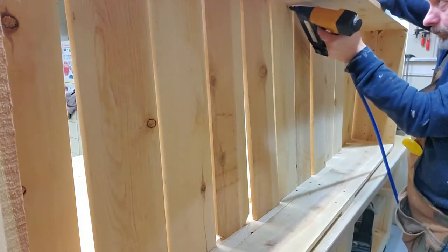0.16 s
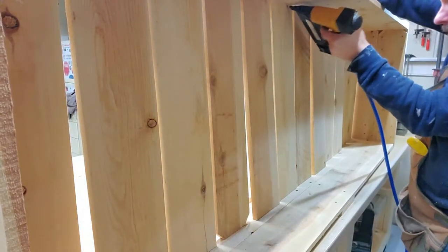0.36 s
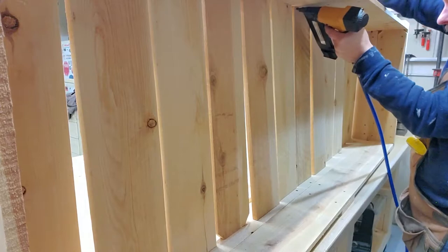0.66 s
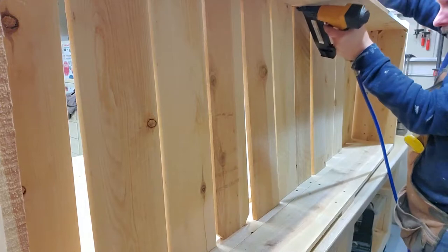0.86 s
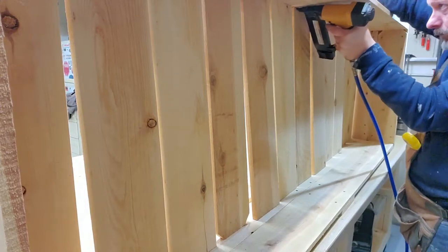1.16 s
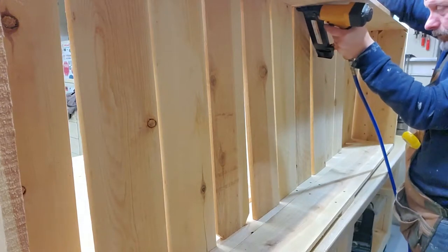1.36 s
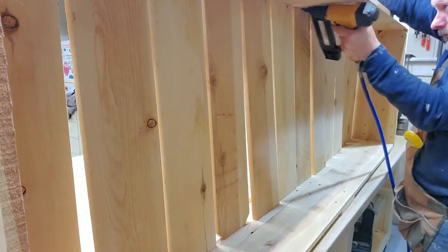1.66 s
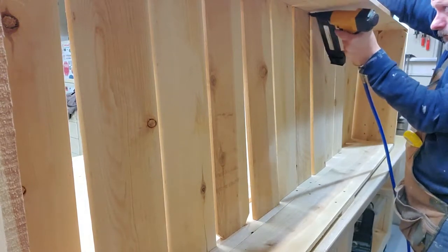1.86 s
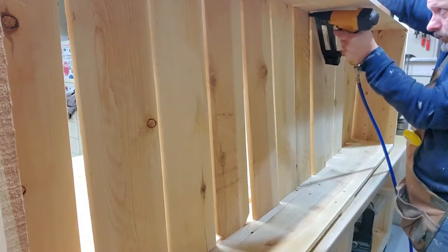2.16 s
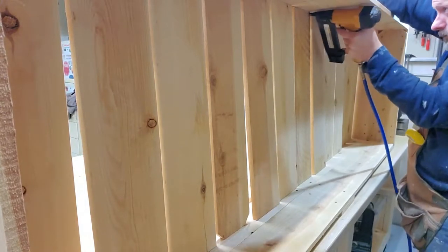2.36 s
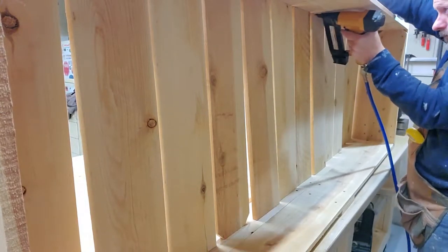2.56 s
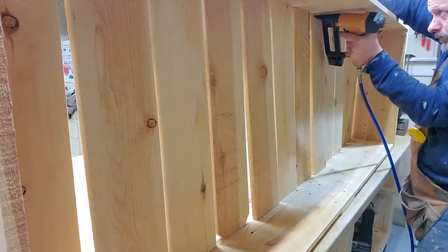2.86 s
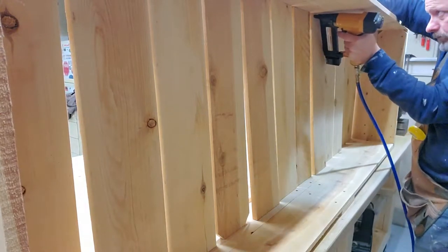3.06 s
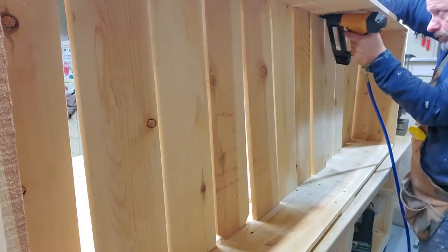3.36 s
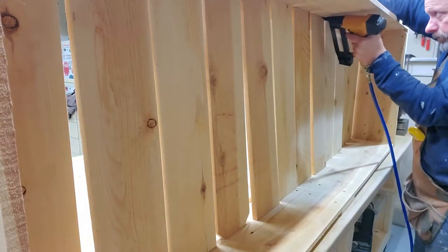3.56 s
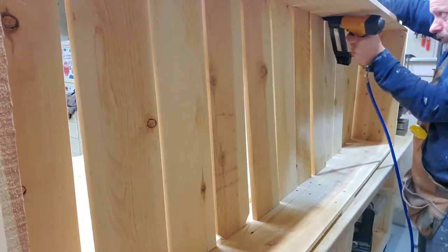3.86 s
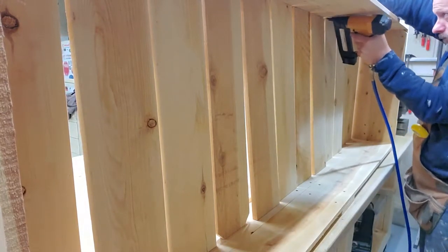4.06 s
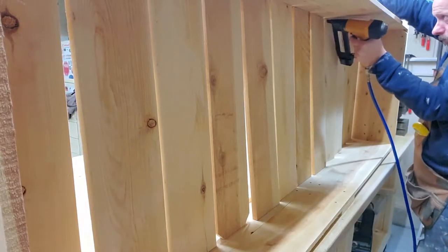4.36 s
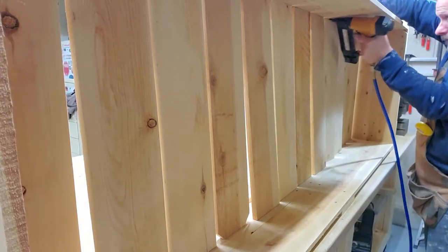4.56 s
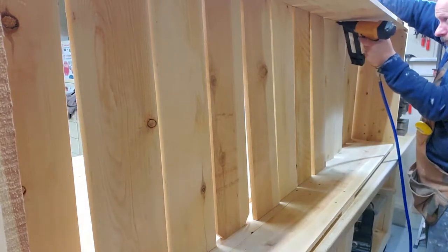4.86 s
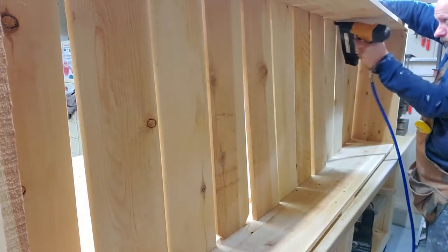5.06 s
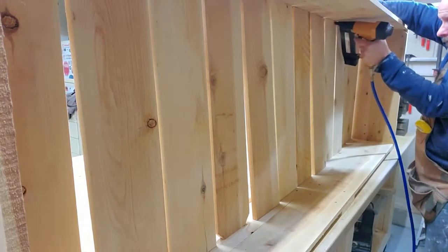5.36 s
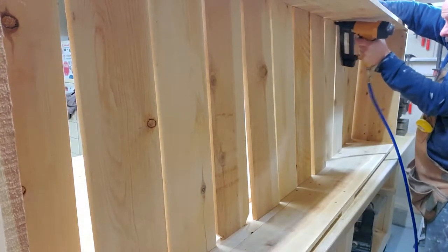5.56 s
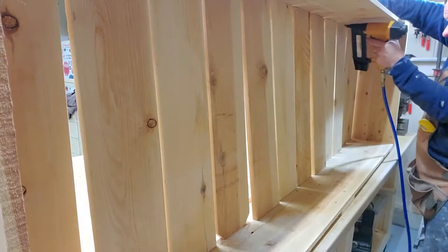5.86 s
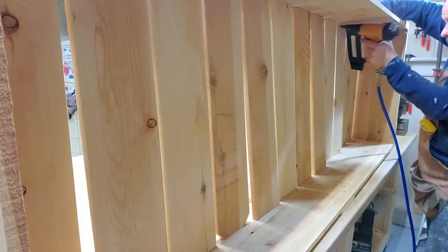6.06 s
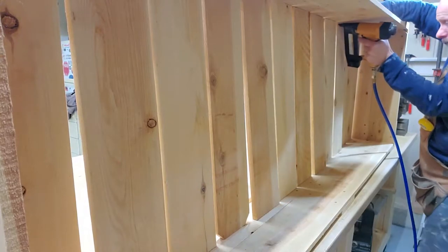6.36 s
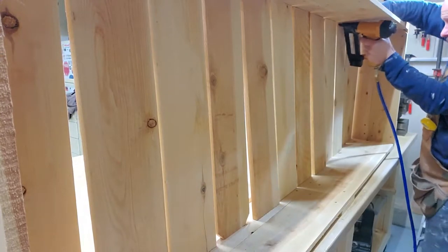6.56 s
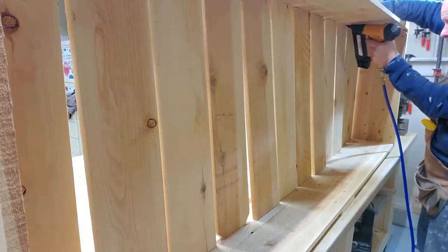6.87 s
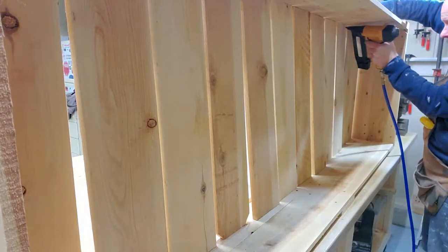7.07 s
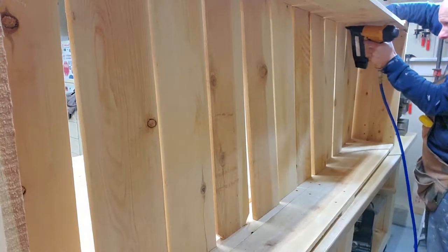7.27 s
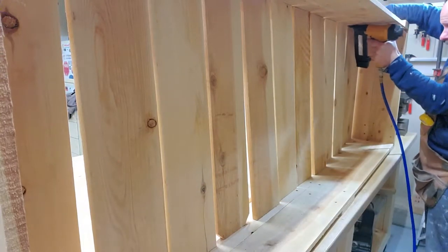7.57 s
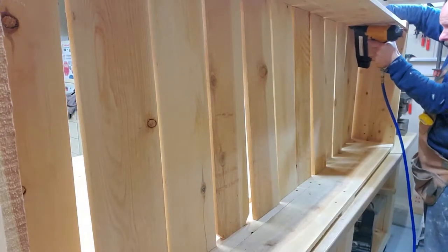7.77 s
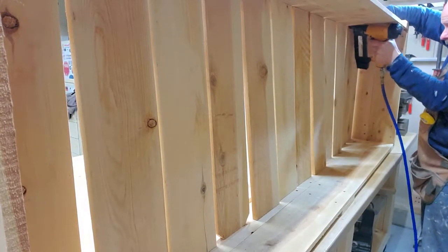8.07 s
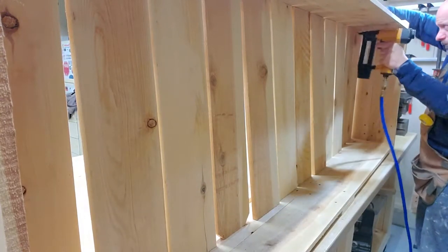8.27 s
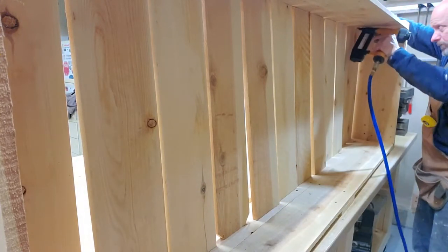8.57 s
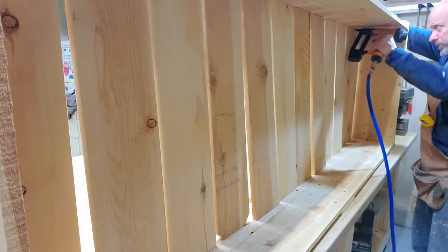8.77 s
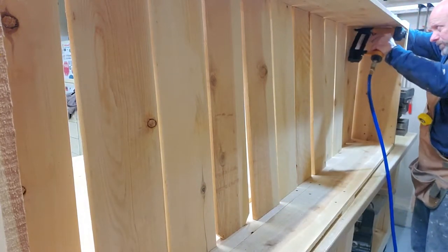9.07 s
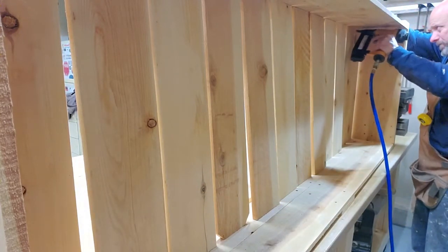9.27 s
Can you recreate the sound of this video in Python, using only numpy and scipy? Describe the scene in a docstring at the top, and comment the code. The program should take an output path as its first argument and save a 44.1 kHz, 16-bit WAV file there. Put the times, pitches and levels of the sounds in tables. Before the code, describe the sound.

An air nailer fires eleven hard nails about a second apart, each crack answered by a burst of air, tool taps and clicks between.

```python
"""Eleven hard, cracking shots of a pneumatic nailer ring out over pine boards in a workshop, each with a hissing blast.
Each shot: the valve spits, the piston slides, the driver slams the nail home, the exhaust blasts, the piston knocks back.
Between shots the nose knocks, clicks and rubs on the wood; still air and a faint hose leak lie underneath.
Shaped noise makes the air, roughened pulses the impacts and decaying sines the boards; spray echoes and a tail follow."""
import sys
import numpy as np
from scipy import signal
from scipy.fft import rfft, irfft, next_fast_len
from scipy.io import wavfile

SR = 44100
rng = np.random.default_rng(int(sys.argv[2]) if len(sys.argv) > 2 else 0)


def persist_wave(psi):
    """Save psi, clipped to +-1, as 16-bit WAV."""
    counts = np.round(np.clip(psi, -1, 1) * 32767).astype(np.int16)
    wavfile.write(sys.argv[1], SR, np.atleast_2d(counts).T)


N = 415419
AGE = np.arange(SR // 2) / SR  # seconds since the start of an event
SIZE = len(AGE)

# Nails driven. Each row: blow in seconds, trigger let go in seconds, board pitch in Hz, blow drive in dB,
# low thud drive in dB, exhaust treble from the aim of the cap in dB at 8 kHz.
SHOTS = [(0.0441, 0.1642, 1570, -16.5, -23.5, 1.5), (1.1081, 1.2342, 1594, -12.5, -23, -1.5),
         (2.326, 2.4578, 1780, -12, -27.5, -1.5), (3.0813, 3.1924, 1750, -11.5, -23, 1),
         (3.977, 4.0953, 1800, -12.5, -24.5, -1), (4.6571, 4.7777, 1750, -17, -25.5, -0.5),
         (5.2332, 5.3452, 1680, -14, -19.5, 0.5), (6.383, 6.4828, 1745, -11.5, -17, -2),
         (7.298, 7.4225, 1760, -13, -17, -3), (8.2313, 8.3277, 1820, -16.5, -23.5, -4),
         (8.7866, 8.8968, 1850, -17.5, -19, -0.5)]
# Tool placed for a nail. Each row: tip touches in seconds, tip pushed home in seconds, touch drive in dB,
# push drive in dB, frame boom in dB.
PLACINGS = [(0.809, 0.822, -37.5, -42, -50), (1.998, 2.067, -44.5, -38.5, -45),
            (2.943, 2.958, -47, -59, -55), (3.705, 3.826, -42, -40.5, -48.5), (4.585, 4.6, -42.5, -40, -41),
            (5.124, 5.145, -40.5, -42, -42.5), (5.871, 5.893, -37, -37, -41.5),
            (7.126, 7.181, -52, -40, -46), (8.082, 8.17, -44.5, -51, -54), (8.698, 8.722, -42, -52, -47)]
# Tool lifted and its tip springs out. Each row: start in seconds, drive in dB.
LIFTS = [(.53, -53), (1.625, -48), (2.82, -52.5), (5.805, -62), (6.967, -46), (7.906, -47)]
# Dull bumps of hand and tool on the frame. Each row: start in seconds, drive in dB.
BUMPS = [(.463, -45.5), (5.175, -29), (5.898, -44)]
# Nose slides along the wood. Each row: start in seconds, length before the fade in seconds, drive in dB.
SLIDES = [(3.837, .11, -46.5), (5.172, .035, -45.5), (7.211, .06, -51.5)]
# Hose coupling leaks as it is bent. Each row: time in seconds, level in dB.
LEAK_LEVELS = [(0, -67.5), (.7, -70), (1.9, -66), (2.9, -74.5), (3.7, -70), (5.0, -65.5), (5.8, -70),
               (6.2, -84.5), (9.4, -82.5)]

# Ring of the boards. Each row: frequency in Hz, relative level in dB, t60 in seconds.
BOARD_MODES = [(261.7, -34.5, 0.44), (343.4, -33, 0.39), (560, -40.5, .3), (729, -31, 0.44),
               (1171, -22, 0.22), (1543, -23, 0.26), (1657, -15.5, 0.15), (1868, -17, 0.22),
               (2400, -35.5, 0.41)]
# Resonances of the exhaust cap. Each row: frequency in Hz, width in Hz, level over the hiss in dB.
CAP_RESONANCES = [(4840, 270, 2), (5960, 70, 0), (6910, 490, 2.5), (7740, 110, 3), (8100, 86, -3)]

# The spectra below give only the colour. Each row: frequency in Hz, relative level in dB per Hz.
# Driver, nail and wood:
BLOW_SPECTRUM = [(50, -21.5), (130, -26), (210, -9), (600, -3), (1000, -8.5), (1350, -8), (1750, 3.5),
                 (2300, -8.5), (4000, -12.5), (8000, -19.5), (15000, -30)]
# Crack of the steel:
CRACK_SPECTRUM = [(300, -21.5), (1500, 0.5), (2600, 0), (4200, 2.5), (6500, 4), (8000, -1), (9300, -27.5),
                  (10700, -15.5), (13000, -22), (16000, -19.5)]
# Air through the valve:
VALVE_SPECTRUM = [(60, -13), (400, -11), (700, -17), (1000, -16), (2000, -7), (3500, 1), (5800, 4.5),
                  (7500, -0.5), (9200, -14), (10600, -3), (13000, -11), (16000, -14.5)]
# Exhaust jet:
EXHAUST_SPECTRUM = [(100, -20), (900, -20.5), (2300, -16.5), (3500, -14), (5200, -2.5), (7000, -3.5),
                    (8200, -5), (9300, -16), (10600, -4), (12000, -12), (13200, -6), (16000, -18)]
# Low puff of the exhaust:
PUFF_SPECTRUM = [(20, -23), (50, -8), (78, 0.5), (105, -1), (140, -5.5), (210, -5.5), (350, -21.5),
                 (1500, -51.5)]
# Piston stop, also the low thud of the blow:
KNOCK_SPECTRUM = [(50, -21), (200, -14), (350, 0.5), (500, -5.5), (690, 2), (900, -4.5), (1400, -0.5),
                  (2200, -14), (4000, -13), (12000, -45.5)]
# Boom of the frame:
BOOM_SPECTRUM = [(20, -24), (45, -14.5), (75, 5), (115, -3.5), (160, -2), (300, -14.5), (700, -38.5),
                 (3000, -69.5)]
# Dull bumps:
BUMP_SPECTRUM = [(60, -21.5), (150, -13.5), (300, -3), (430, -4.5), (700, -9), (1500, -18), (6000, -44.5)]
# Nose on wood:
TAP_SPECTRUM = [(50, -27), (200, -7), (380, -0.5), (600, -0.5), (850, -2), (1100, -1.5), (1600, 0),
                (2000, -2), (2500, -24.5), (4000, -28.5), (12000, -52.5)]
# Steel safety tip:
CLICK_SPECTRUM = [(300, -20), (1200, -1.5), (2000, -2.5), (3000, 6), (4500, 2.5), (6500, 4.5), (8000, -5),
                  (9300, -20), (10700, -15.5), (13000, -18.5), (16000, -23)]
# Still air of the workshop:
AIR_SPECTRUM = [(20, -12), (60, 0), (110, -4), (220, -14), (700, -11), (1200, -17), (4500, -17.5),
                (8000, -28.5), (9300, -38), (11000, -31), (13200, -27), (16000, -32)]
# Hose coupling:
LEAK_SPECTRUM = [(6000, -42.5), (9500, -21.5), (11000, -10), (12200, -7.5), (13200, -2), (14500, -6.5),
                 (16000, -12.5)]

# Likeness of the two channels. Each row: frequency in Hz, left-right correlation (no unit).
LIKENESS = [(100, .97), (350, 0.87), (700, 0.36), (1500, -0.02), (3000, 0.05), (6000, 0)]
# Colour of the two microphones. Each row: frequency in Hz, left minus right in dB.
BALANCE = [(90, -1.5), (700, -0.1), (1600, 0), (3000, 0.4), (5000, -0.5), (7000, 6.5), (9000, -3),
           (13000, 3.5)]
# Workshop tail. Each row: band centre in Hz, t60 in seconds, relative level in dB.
ROOM_BANDS = [(60, 0.5, 3), (200, 0.79, 2), (600, 0.82, 0), (1330, 0.66, -1), (3120, 0.68, 1.5),
              (5660, 0.69, -2.5), (7230, 0.66, -9), (9800, 0.48, -0.5), (15000, 0.16, -4.5)]

# the same air pressure drives every cycle
VALVE_DB, CRACK_DB, EXHAUST_DB, RETURN_DB = -24, -19, -11.5, -21
TRIGGER_LEAD_S, TRIGGER_DB = 0.05, -54  # the trigger clicks this long before the blow
VALVE_LEAD_S, VALVE_OPENS_S = .028, 0.0049  # air rushes in this long before the blow
BUMPER_S, BUMPER_CRACK_DB = .0042, -1.5  # the driver bottoms after the blow; its crack relative to the first
CRACK_RISE_DB_PER_S = 0.4745  # the crack grows as the tool works into the corner of the frame
NAIL_GRIND_S, TOUCH_GRIND_S = .0016, .0008
EXHAUST_OPENS_S, RETURN_STROKE_S = 0.0015, .0315
JET_DIRECT_DB = -9
FLUTTER_DB, FLUTTER_S = 2, .002  # an air jet flutters: spread of its level, length of one eddy
TOUCH_DIRECT_DB, TOUCH_ECHO_T60_S = -1, .06
NOSE_DAMPING_T60_S = .2
GRAZE_LEAD_S, GRAZE_DB = 0.015, -13  # the nose grazes the board just before the touch; relative to the touch
JOLT_S, JOLT_DB, JOLT_BOUNCE_S = 5.1673, -21.5, 0.0023  # once the tool's body hits the frame hard and bounces
AIR_DB = -63.5
BASS_CUT_HZ, TOP_CUT_HZ = 48, 16000


def amp(db):
    """Decibels to gain."""
    return 10 ** (np.asarray(db) / 20)


def at_hz(points, hz, axis=1):
    """Read a table on a log-frequency axis."""
    table = np.array(points)
    return np.interp(np.log(np.maximum(hz, 1)), np.log(table[:, 0]), table[:, axis])


def fade(t, t60):
    """Exponential decay, 60 dB down after t60."""
    return np.exp(-np.log(1000) * t / t60)


def add(track, s, sound):
    """Mix a sound into a track at a time."""
    i = max(0, round(s * SR))
    track[..., i:i + sound.shape[-1]] += sound[..., :N - i]


def empty_tracks():
    """A stereo track for the close sound and a mono send to the room."""
    return np.zeros((2, N)), np.zeros(N)


def gust(rise, hold, t60):
    """A flow opens gradually, holds until the given age and dies away."""
    opening = np.minimum(AGE / rise, 1) ** 2
    return opening * fade(np.maximum(AGE - hold, 0), t60)


def hiss(spectrum, size=SIZE, resonances=()):
    """Turbulent noise with a spectrum and narrow resonances on top; rms 1."""
    hz = np.fft.rfftfreq(size, 1 / SR)
    peaks = sum(amp(db) ** 2 / (1 + (2 * (hz - f) / width) ** 2) for f, width, db in resonances)
    gain = amp(at_hz(spectrum, hz)) * np.sqrt(1 + peaks)
    noise = rfft(rng.standard_normal(size))
    return irfft(noise * gain, size) / np.sqrt(np.mean(gain ** 2))


def flutter():
    """The quick, uneven level of a turbulent jet; rms 1."""
    eddies = np.interp(AGE / FLUTTER_S, np.arange(1000), rng.standard_normal(1000))
    gain = amp(FLUTTER_DB * eddies)
    return gain / np.sqrt(np.mean(gain ** 2))


def uneven(spectrum, ripple_db):
    """The spectrum with broad peaks and dips that depend on where and how the tool is held."""
    hz = np.geomspace(20, 16000, 70)
    ripple = ripple_db * rng.standard_normal(len(hz)) * np.minimum(hz / 800, 1)
    return np.column_stack([hz, at_hz(spectrum, hz) + ripple])


def pulse(spectrum):
    """The shortest causal pulse with this spectrum, by way of the minimum-phase cepstrum; energy 1."""
    log_gain = np.log(amp(at_hz(spectrum, np.fft.rfftfreq(2 * SIZE, 1 / SR))))
    cepstrum = irfft(log_gain)
    cepstrum[1:SIZE] *= 2
    cepstrum[SIZE + 1:] = 0
    wave = irfft(np.exp(rfft(cepstrum)))[:SIZE]
    return wave / np.linalg.norm(wave)


def soften(sound, s):
    """A contact or a valve that takes some time to act loses its treble."""
    window = np.hanning(int(s * SR) + 3)
    return signal.fftconvolve(sound, window / window.sum())[:SIZE]


def strike(spectrum, grind_s):
    """A contact whose small slips roughen the treble; its energy equals five milliseconds at rms 1."""
    high_pass = signal.butter(2, 1300, "high", fs=SR, output="sos")
    slips = signal.sosfilt(high_pass, rng.standard_normal(SIZE) * fade(AGE, 4 * grind_s))
    slips[0] += 2 * np.linalg.norm(slips)  # the first contact is the hardest
    wave = signal.fftconvolve(pulse(spectrum), slips)[:SIZE]
    return wave / np.linalg.norm(wave) * np.sqrt(.005 * SR)


def boards(detune, spread_db):
    """Decaying board modes that ring a little differently at every place where they are struck."""
    chance = rng.standard_normal((len(BOARD_MODES), 3))
    ring = 0
    for (hz, db, t60), (pitch, level, sign) in zip(BOARD_MODES, chance):
        tone = np.sin(2 * np.pi * hz * (1 + detune * pitch) * AGE)
        ring = ring + amp(db - 11.0 + spread_db * level) * np.sign(sign) * fade(AGE, t60) * tone
    return ring


def diffuse(pair):
    """Two unrelated noises as two close microphones hear them: alike in the bass."""
    size = len(pair[0])
    mid, side = rfft(pair)
    alike = np.clip(at_hz(LIKENESS, np.fft.rfftfreq(size, 1 / SR)), -.99, .99)
    mid = np.sqrt(1 + alike) * mid
    side = np.sqrt(1 - alike) * side
    return irfft((mid + side * [[1], [-1]]) / np.sqrt(2), size)


def frame(sound, direct_db, echo_db, gap, t60):
    """The straight path, then a spray of echoes between the boards, new at each place of the tool."""
    age = AGE[:SIZE // 4]
    patchy = amp(3.5 * rng.standard_normal(len(age)))  # echoes of very unequal strength
    spray = diffuse(rng.standard_normal((2, len(age))) * patchy)
    spray = spray * (age > gap) * fade(age, t60)
    paths = amp(echo_db) * spray / np.sqrt(np.sum(spray ** 2) / 2)
    paths[[0, 1], [3, 0]] += amp(direct_db)  # straight path: left three samples after right
    return signal.fftconvolve(sound[None], paths, axes=1)[:, :SIZE]


def steady(spectrum):
    """Diffuse noise that lasts through the scene; rms 1."""
    size = next_fast_len(N)
    return diffuse([hiss(spectrum, size=size), hiss(spectrum, size=size)])[:, :N]


def still_air():
    """The air of the workshop: steady broadband noise, strongest in the bass."""
    return amp(AIR_DB) * steady(AIR_SPECTRUM)


def hose_leak():
    """Air escapes at the coupling as a faint treble hiss whose level drifts as the hose is bent."""
    level_db = np.interp(np.arange(N) / SR, *np.transpose(LEAK_LEVELS))
    return amp(level_db) * steady(LEAK_SPECTRUM)


def workshop(sound):
    """A diffuse tail built from overlapping bands; it dies soonest at the top of the treble."""
    age = np.arange(int(1.2 * SR)) / SR
    field = rfft(diffuse(rng.standard_normal((2, len(age)))))
    hz = np.fft.rfftfreq(len(age), 1 / SR)
    centres = [row[0] for row in ROOM_BANDS]
    tail = 0
    for (_, t60, db), own in zip(ROOM_BANDS, np.eye(len(ROOM_BANDS))):
        band = irfft(field * np.interp(hz, centres, own), len(age))
        tail = tail + band * fade(age, t60) * amp(db)
    build_up = np.clip((age - .004) / 0.0087, 0, 1)
    return signal.fftconvolve(sound[None], amp(-33.5) * tail * build_up, axes=1)[:, :N]


def sliding():
    """The nose slides along the wood: friction as a swell of bright and woody noise."""
    near, send = empty_tracks()
    for s, length, db in SLIDES:
        scrape = hiss(CLICK_SPECTRUM) + amp(-6.0) * hiss(TAP_SPECTRUM)
        rub = amp(db) * scrape * gust(.015, length, .05)
        add(near, s, frame(rub, -15, -1.5, 0.0017, 0.037))
        add(send, s, amp(-8.5) * rub)
    return near, send


def bumping():
    """Hand and tool bump the frame, and the nose grazes it before a touch: soft bursts of low noise."""
    near, send = empty_tracks()
    grazes = [(s - GRAZE_LEAD_S, db + GRAZE_DB) for s, _, db, _, _ in PLACINGS]
    for s, db in BUMPS + grazes:
        bump = amp(db) * hiss(BUMP_SPECTRUM) * gust(.005, 0.011, 0.17)
        add(near, s, frame(bump, 0, -6.0, 0.0015, 0.086))
        add(send, s, amp(-4.5) * bump)
    return near, send


def knock():
    """The nose meets the wood, and mutes the board as it rests on it."""
    ring = boards(detune=0.046, spread_db=0.0) * fade(AGE, NOSE_DAMPING_T60_S)
    return strike(uneven(TAP_SPECTRUM, ripple_db=5.0), TOUCH_GRIND_S) + amp(12.5) * ring


def click():
    """A small steel part of the tool snaps against its stop: a bright strike of even colour."""
    return strike(uneven(CLICK_SPECTRUM, ripple_db=0.0), grind_s=0.0022)


def handling():
    """The tip touches, is pushed home so that the frame booms, the trigger clicks, and the tool is lifted."""
    near, send = empty_tracks()
    touches = [(s, db) for s, _, db, _, _ in PLACINGS]
    pushes = [(s, db) for _, s, _, db, _ in PLACINGS]
    contacts = [(s, amp(db) * (knock() + click())) for s, db in touches + pushes + LIFTS]
    for s, *_ in SHOTS:
        if s > TRIGGER_LEAD_S:
            contacts.append((s - TRIGGER_LEAD_S, amp(TRIGGER_DB) * click()))
    for s in (JOLT_S, JOLT_S + JOLT_BOUNCE_S):
        contacts.append((s, amp(JOLT_DB) * knock()))
    for s, touch in contacts:
        add(near, s, frame(touch, TOUCH_DIRECT_DB, 4.64, .002, TOUCH_ECHO_T60_S))
        add(send, s, amp(0.3) * touch)
    for _, s, _, _, boom_db in PLACINGS:
        add(near, s, amp(boom_db) * hiss(BOOM_SPECTRUM) * gust(0.019, 0.029, 0.35))
    return near, send


def venting():
    """The trigger is let go: a blast with a low puff leaves the cap, and the piston knocks against its top stop."""
    near, send = empty_tracks()
    puff = soften(pulse(PUFF_SPECTRUM), 0.0043)
    for _, s, *_, aim_db in SHOTS:
        # the jet is brighter when the cap points at the listener
        jet = [(hz, db + aim_db * np.clip(hz / 4000 - 1, 0, 1.5)) for hz, db in EXHAUST_SPECTRUM]
        jet_noise = hiss(uneven(jet, ripple_db=0.7), resonances=CAP_RESONANCES)
        blast = amp(EXHAUST_DB) * jet_noise * flutter() * gust(EXHAUST_OPENS_S, 0.014, 0.13)
        add(near, s, frame(blast, JET_DIRECT_DB, 0.44, .0002, 0.027))
        add(send, s, amp(-8.5) * blast)
        # the puff starts just ahead of the blast
        add(near, s - .002, frame(amp(-1.1) * puff, 0, -12.5, .006, 0.11))
        add(send, s, amp(-9.5) * puff)
        stop = amp(RETURN_DB) * strike(KNOCK_SPECTRUM, grind_s=0.0029)
        add(near, s + RETURN_STROKE_S, frame(stop, -4.0, 1.2, .002, 0.099))
        add(send, s + RETURN_STROKE_S, amp(-6.5) * stop)
    return near, send


def firing():
    """Air rushes into the cylinder, the piston gathers speed and the driver hits nail and wood."""
    near, send = empty_tracks()
    for s, _, board_hz, blow_db, thud_db, _ in SHOTS:
        valve_noise = hiss(uneven(VALVE_SPECTRUM, ripple_db=0.6))
        valve = amp(VALVE_DB) * valve_noise * flutter() * gust(VALVE_OPENS_S, 0.032, 0.26)
        # the slide of the piston swells until the blow
        swell = np.minimum(AGE / VALVE_LEAD_S, 1) ** 2 * (AGE < VALVE_LEAD_S)
        rush = valve + amp(-22.0) * hiss(BLOW_SPECTRUM) * swell
        add(near, s - VALVE_LEAD_S, frame(rush, JET_DIRECT_DB, 0.68, 0.00028, 0.029))
        add(send, s - VALVE_LEAD_S, amp(-5.5) * rush)

        impact = amp(-2.5) * strike(BLOW_SPECTRUM, NAIL_GRIND_S)
        ring = amp(14.5) * boards(detune=.02, spread_db=3.0)
        thud = amp(thud_db) * strike(KNOCK_SPECTRUM, grind_s=0.002)
        wood = amp(blow_db) * (impact + ring) + thud
        add(near, s, frame(wood, -1.9, -3.5, 0.0038, 0.14))
        # the board under the nose flexes for a few cycles as the nail goes in
        flex = np.sin(2 * np.pi * board_hz * AGE) * gust(0.00075, 0.00088, 0.0063)
        add(near, s, frame(amp(blow_db + 8) * flex, 0, -10, 0.0052, .04))

        # the crack of the steel arrives mostly by way of the boards
        crack_db = CRACK_DB + CRACK_RISE_DB_PER_S * s
        steel = amp(crack_db) * strike(uneven(CRACK_SPECTRUM, ripple_db=1.5), grind_s=0.0013)
        add(near, s, frame(steel, -1.0, 6.0, .0038, 0.11))
        # the driver bottoms on its bumper just after the first impact
        bottom = amp(blow_db - 3.5) * strike(BLOW_SPECTRUM, grind_s=0.00099)
        bottom = bottom + amp(BUMPER_CRACK_DB) * steel
        add(near, s + BUMPER_S, frame(bottom, -0.88, -2.5, 0.00066, 0.033))

        add(near, s, amp(-46.5) * hiss(BOOM_SPECTRUM) * gust(0.021, 0.083, 0.34))
        add(send, s, amp(-4.0) * wood + amp(8.0) * steel)
    return near, send


def scene():
    """The tool, the room's answer, the still air of the workshop and a faint leak at the hose coupling."""
    sources = [sliding(), bumping(), handling(), venting(), firing()]
    near, send = (sum(parts) for parts in zip(*sources))
    # as the tool moves on, one pattern of room echoes gives way to another
    place = 1.306 * np.arange(N) / SR  # radians
    room = workshop(send * np.cos(place)) + workshop(send * np.sin(place))
    return still_air() + hose_leak() + room + near


def record(dry):
    """The two microphones differ in colour; the deep bass is cut, peaks are rounded and the top is cut."""
    size = 2 * next_fast_len(N)
    tilt_db = at_hz(BALANCE, np.fft.rfftfreq(size, 1 / SR))
    heard = irfft(rfft(dry, size) * amp(tilt_db * [[.5], [-.5]]))[:, :N]
    bass_cut = signal.butter(2, BASS_CUT_HZ, "high", fs=SR, output="sos")
    rounded = np.tanh(signal.sosfilt(bass_cut, heard))
    top_cut = signal.ellip(10, .1, 90, TOP_CUT_HZ, fs=SR, output="sos")
    return signal.sosfilt(top_cut, rounded)


dry = scene()
out = record(dry)
persist_wave(out)
```